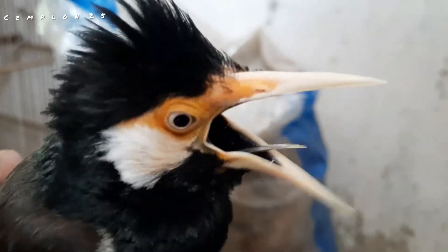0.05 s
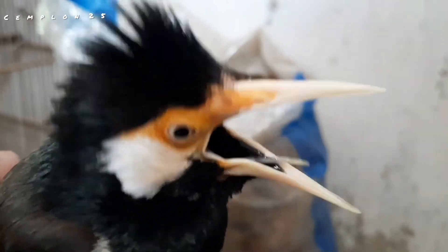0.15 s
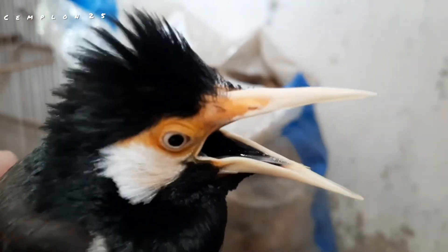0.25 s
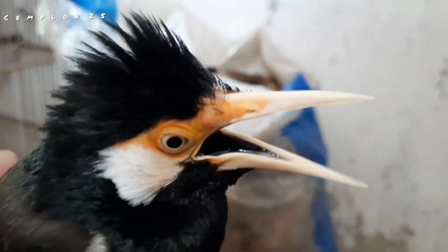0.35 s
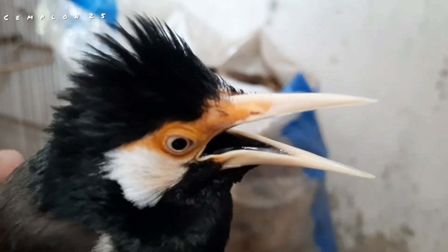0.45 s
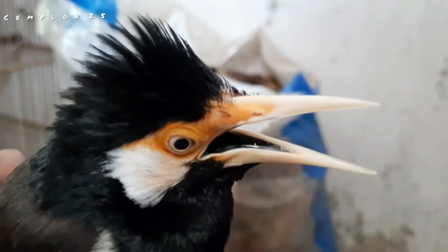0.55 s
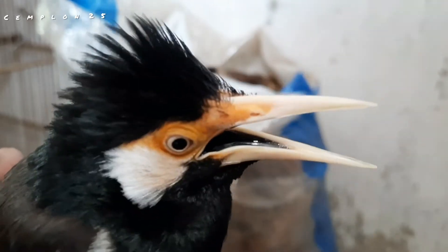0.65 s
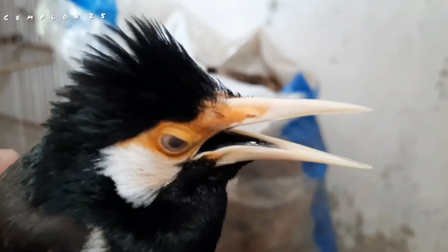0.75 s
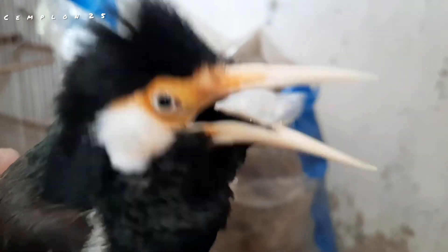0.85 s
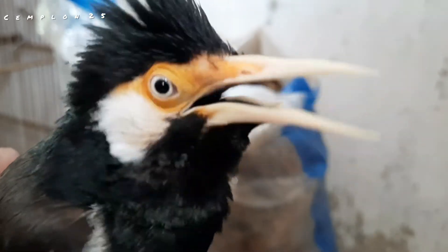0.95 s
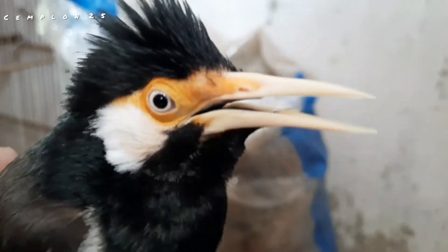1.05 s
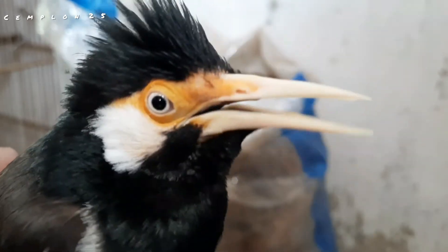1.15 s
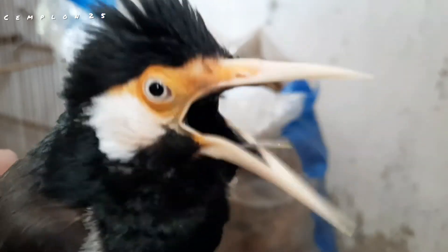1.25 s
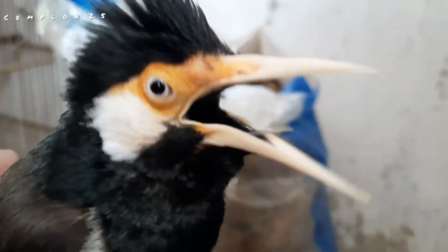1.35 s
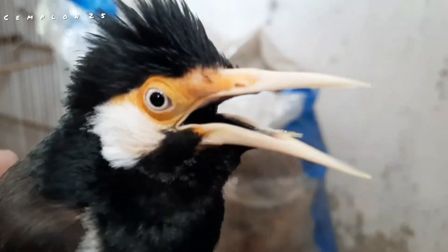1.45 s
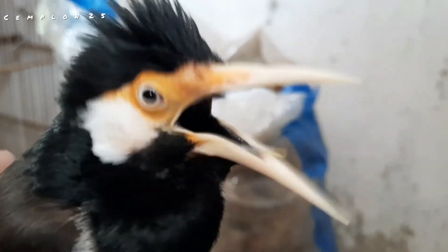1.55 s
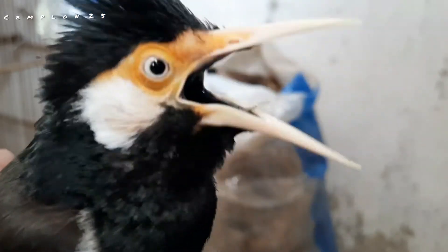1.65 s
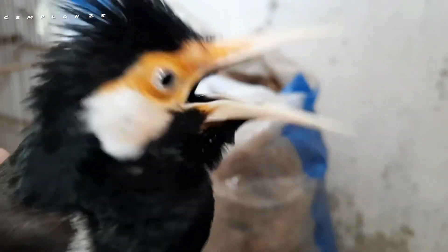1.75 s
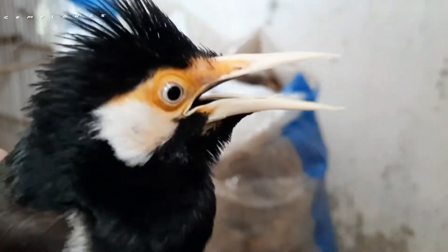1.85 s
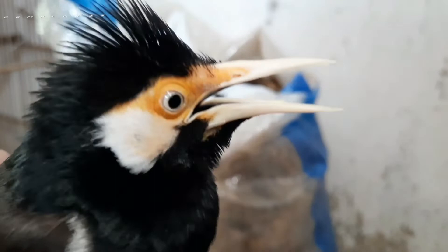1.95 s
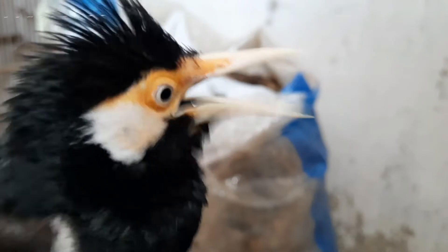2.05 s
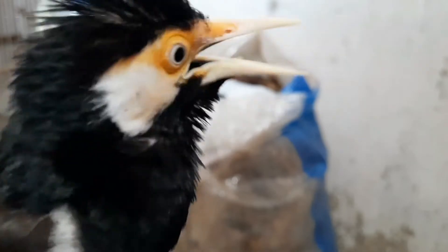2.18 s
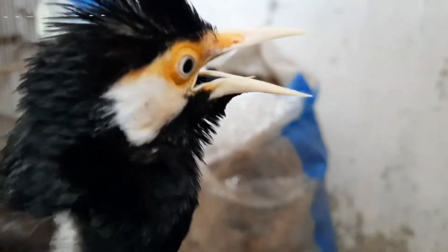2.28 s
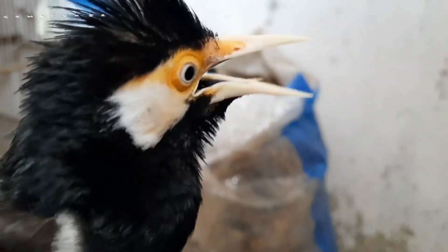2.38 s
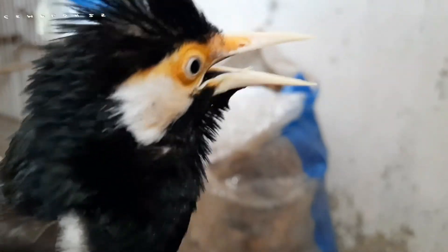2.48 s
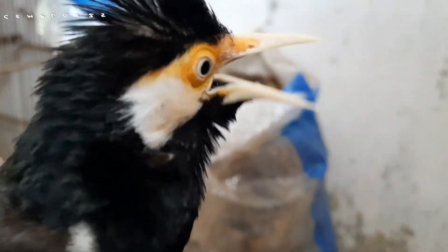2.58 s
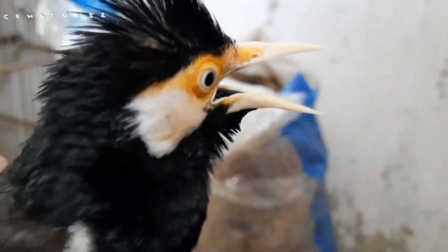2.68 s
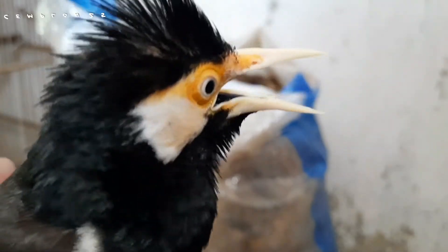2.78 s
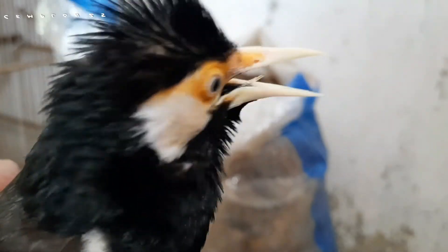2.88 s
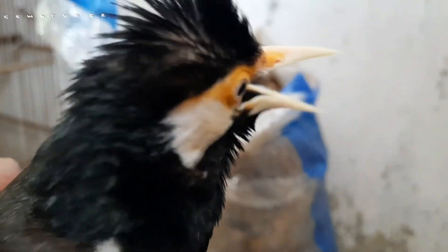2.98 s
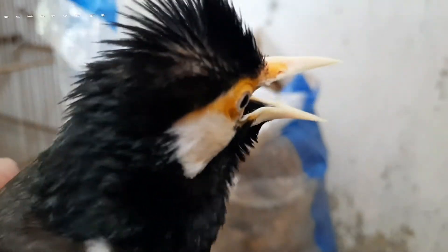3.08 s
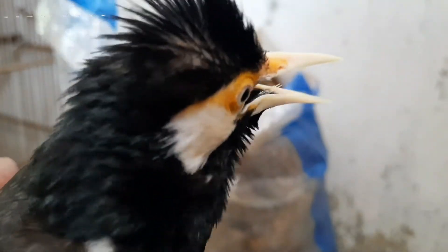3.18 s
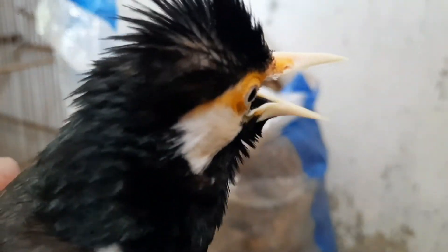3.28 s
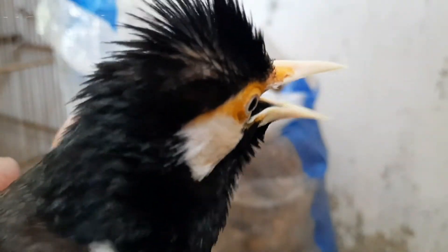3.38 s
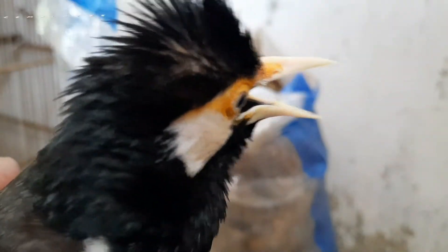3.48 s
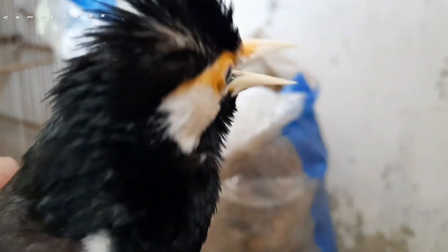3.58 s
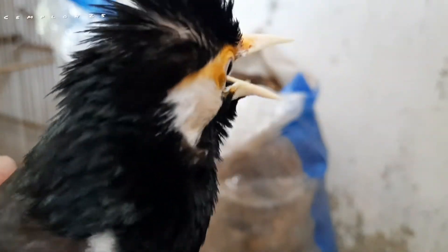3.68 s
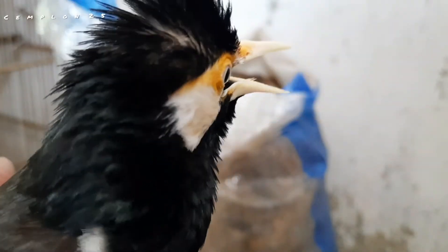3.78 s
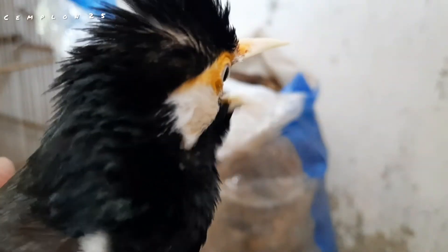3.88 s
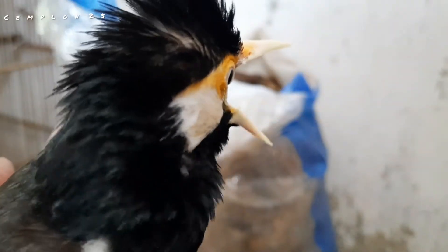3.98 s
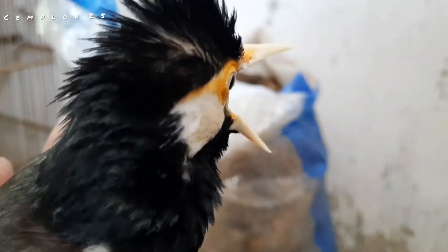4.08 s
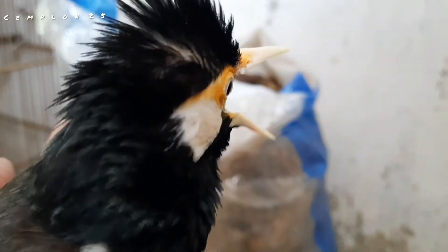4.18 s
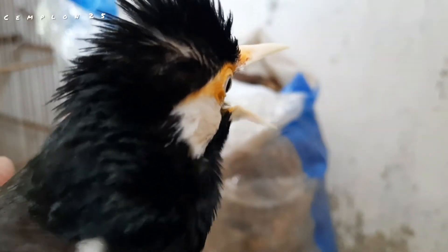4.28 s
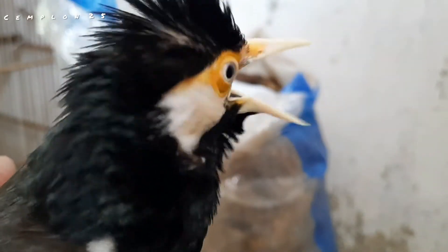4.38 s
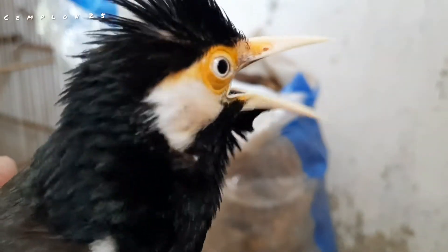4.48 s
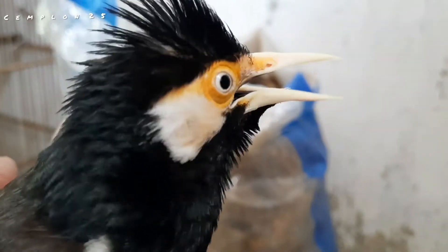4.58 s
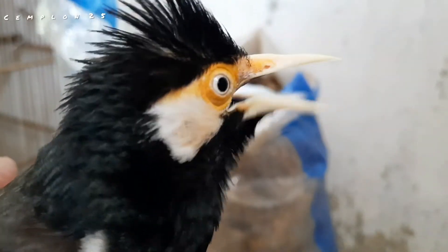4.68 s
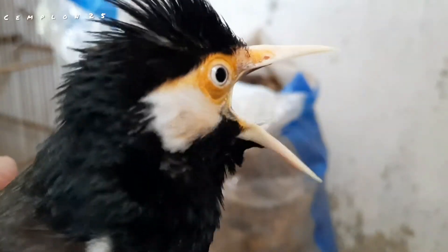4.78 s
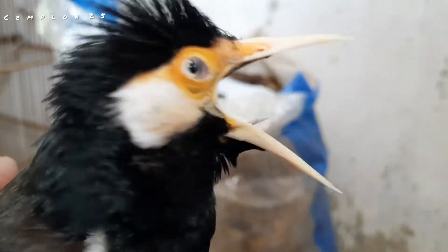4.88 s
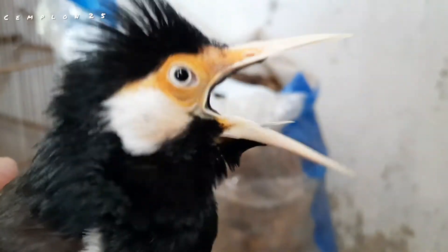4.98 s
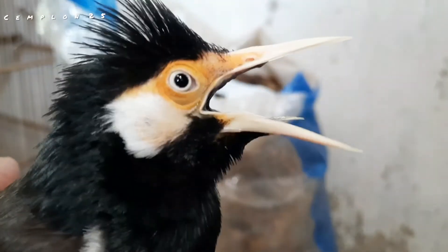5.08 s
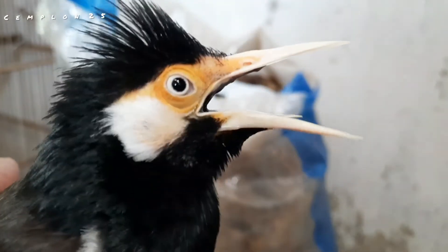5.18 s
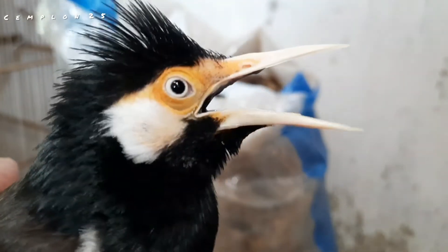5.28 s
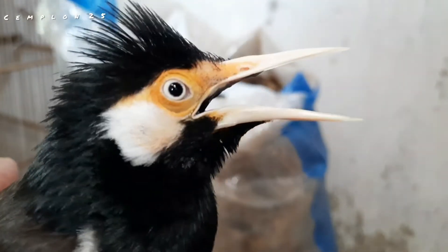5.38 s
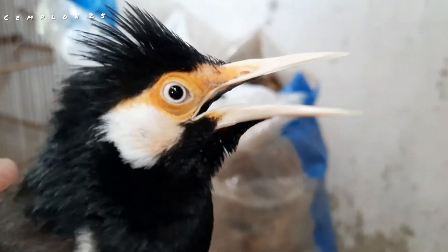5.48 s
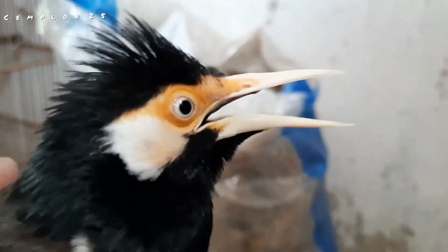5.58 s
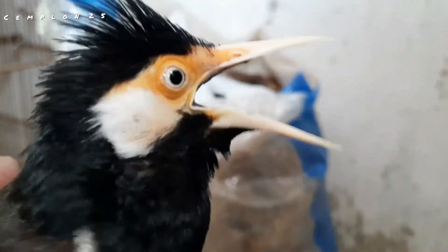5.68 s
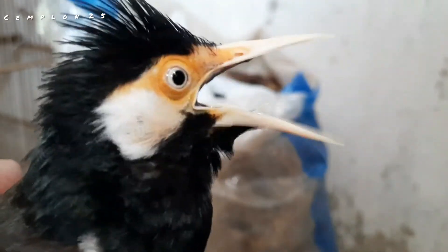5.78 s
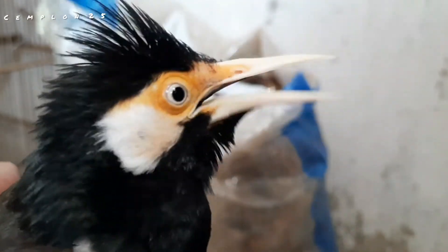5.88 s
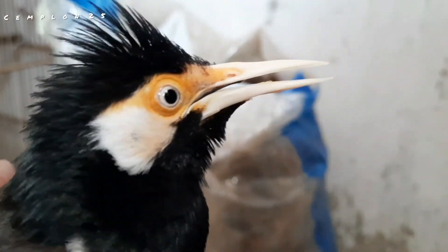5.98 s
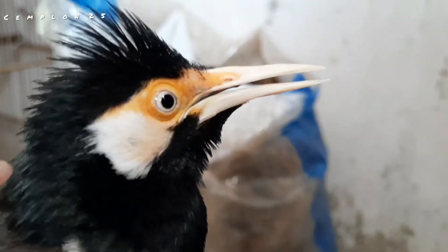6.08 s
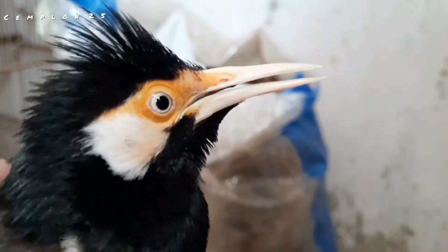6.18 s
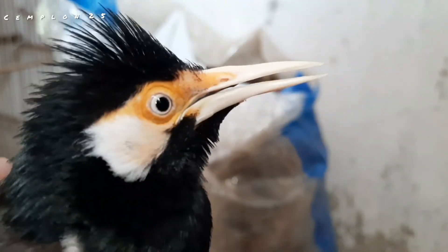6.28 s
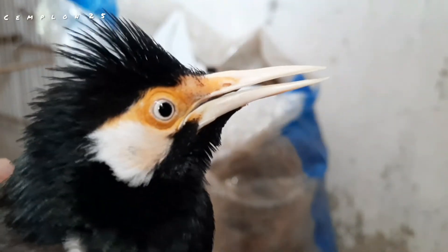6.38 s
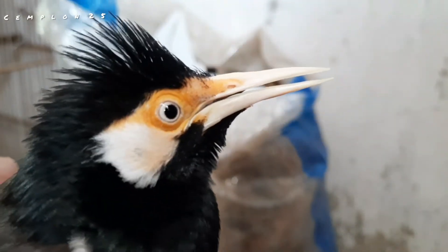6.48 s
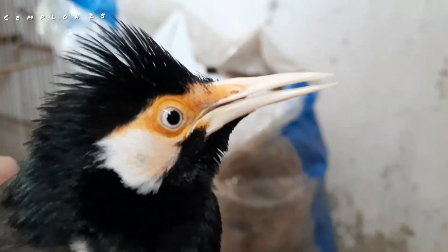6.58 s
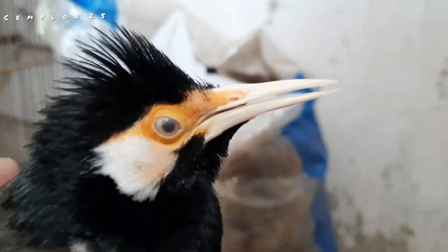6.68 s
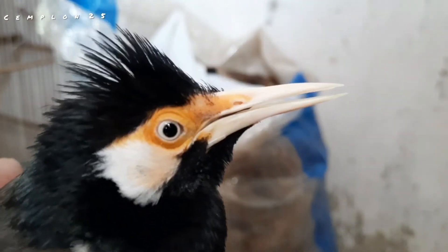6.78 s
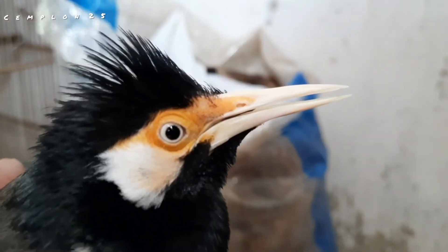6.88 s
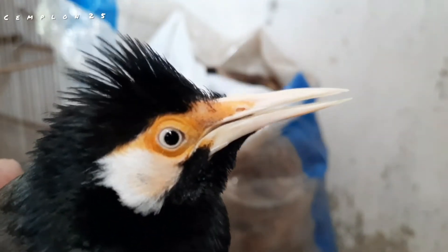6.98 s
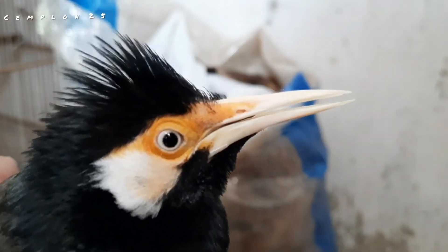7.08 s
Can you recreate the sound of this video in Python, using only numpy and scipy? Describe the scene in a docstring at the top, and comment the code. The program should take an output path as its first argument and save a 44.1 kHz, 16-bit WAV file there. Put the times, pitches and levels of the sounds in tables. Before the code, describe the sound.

A starling sings very close to the microphone in a small, hard-walled room. A loud cut-off whistle opens, then spaced rasping falling slurs, five buzzy churrs ending in rising tones, a nasal note, a falling buzz and a rapid burst of chips. Soft wheezes and squeaks fill the gaps. Two bright chirps follow, then near silence with a few bill clicks over a faint motor hum.

```python
"""In a small hard-walled room, a starling sings very close to a microphone with two ports.
Slurred whistles, trilled churrs, a nasal note, a falling buzz, harsh chatter and chirps are sine waves with
shaken pitch, overtones and hiss. Soft wheezy song between them is noise and a thin tone in a gliding
resonance; squeaks, dry creaks and bill clicks join in. Behind the bird a motor hums and something purrs
far off, made from low sines and banded noise. Room echoes and an overloading microphone shape the sound."""
import sys
import numpy as np
from scipy import signal
from scipy.fft import rfft, irfft, next_fast_len
from scipy.io import wavfile
from scipy.ndimage import uniform_filter1d, map_coordinates

SR = 44100
rng = np.random.default_rng(int(sys.argv[2]) if len(sys.argv) > 2 else 0)


def wav_record(signal):
    """Record a signal, one row per channel, as 16-bit PCM in the file named by sys.argv[1]."""
    frames = np.transpose(np.atleast_2d(signal))
    bounded = np.clip(frames, -1, 1)
    # unit amplitude maps onto the largest positive 16-bit level
    quanta = np.round(bounded * 32767).astype(np.int16)
    wavfile.write(sys.argv[1], SR, quanta)


N = 314874
TOP_HZ = 16200  # no sound passes above this

# Colour of the turbulent air in the throat. Each row: frequency in Hz, relative level in dB per Hz.
HISS = [(300, -22.5), (1100, -20), (3900, -0.5), (5600, -7.5), (7200, -3), (9200, -4), (11200, -13),
        (13000, -8), (16000, -16)]


def amp(db):
    """Turn decibels into a multiplier."""
    return 10 ** (np.asarray(db) / 20)


def unit(x):
    """Scale a sound to an rms of 1."""
    return x / np.sqrt(np.mean(x ** 2) + 1e-20)


def along(points, hz):
    """Read a value between (Hz, value) points, on a log frequency axis."""
    point_hz, value = np.transpose(points)
    return np.interp(np.log(hz + 1), np.log(point_hz + 1), value)


def course(rows, at):
    """Read each column after the first at the given places along the first."""
    place, *columns = np.transpose(rows)
    return [np.interp(at, place, column) for column in columns]


def gesture(rows):
    """The columns of a note, sample by sample from its first row to its last."""
    return course(rows, np.arange(rows[0][0], rows[-1][0], 1 / SR))


def add(track, s, x):
    """Mix x into the track at s seconds."""
    i = int(np.clip(s * SR, 0, N))
    track[i:i + len(x)] += x[:N - i]


def wobble(rate, size):
    """A smooth random curve with this many random points a second."""
    points = rng.standard_normal(int(size * rate / SR) + 4)
    return map_coordinates(points, [np.arange(size) * rate / SR])


def filtered(x, response):
    """Multiply the spectrum of x by a response that depends on frequency."""
    n = x.shape[-1]
    padded = next_fast_len(n + 8192)  # spare room keeps the end from wrapping to the start
    return irfft(rfft(x, padded) * response(np.fft.rfftfreq(padded, 1 / SR)), padded)[..., :n]


def noise(spectrum, size):
    """Coloured noise with an rms of 1."""
    return unit(filtered(rng.standard_normal(size), lambda hz: amp(along(spectrum, hz))))


def phase_of(hz):
    """Add up a changing frequency into the angle of a sine."""
    return 2 * np.pi * np.cumsum(hz) / SR


def eased(x, edge=0.00081):
    """Soft start and stop, edge seconds each."""
    i = np.arange(len(x))
    return x * np.clip(np.minimum(i, i[::-1]) / (edge * SR), 0, 1)


def swell(t, length, attack, release=0.011):
    """Attack, hold and release within the length of a note, all in seconds."""
    return np.clip(np.minimum(t / attack, (length - t) / release), 0, 1)


def syrinx(pitch, rasp, overtone_db, slope_db, hiss_db, jitter=.03, shimmer_db=3):
    """A vibrating membrane: rasp shakes its pitch, level and overtones and lets turbulent air through."""
    # What throat and open bill let through above the fundamental. Each row: frequency in Hz, gain in dB.
    throat = [(4500, 3), (5400, -8.5), (6500, -2), (9700, -2.5), (11200, 7.5), (12600, 3), (14000, -2),
              (15800, 2.5)]
    n = len(pitch)
    shake = wobble(1300, n) + .5 * wobble(220, n)
    phase = phase_of(pitch * (1 + jitter * rasp * shake))
    tone = np.sin(phase)
    for k in range(2, 6):
        flicker_db = 2 * shimmer_db * rasp * wobble(170, n)
        level_db = overtone_db - slope_db * np.log2(k / 2)  # overtones weaken by slope_db per octave
        overtone = amp(level_db + along(throat, k * pitch) + flicker_db)
        tone += overtone * (k * pitch < TOP_HZ) * np.sin(k * phase)
    air = amp(hiss_db) * rasp * noise(HISS, n)
    shimmer = amp(shimmer_db * rasp * wobble(260, n))
    return eased((np.sqrt(2) * tone + air) * shimmer)


def pop(hz):
    """The syrinx opens with a short tick that falls in pitch."""
    pitch = hz * np.linspace(1, .55, SR // 200)
    return syrinx(pitch, 1.0, overtone_db=-20, slope_db=14, hiss_db=-6.5)


def held(rasp=.08, catch_s=.062, catch_rate=76, recover_s=.028, flick_hz=260):
    """A loud whistle lifts; later the voice catches and stutters, and pitch flicks up as the flow drops."""
    # One row: start in seconds, length in seconds, level in dB, first pitch in Hz, last pitch in Hz.
    held_note = (0, 0.09, -6, 4060, 4280)
    s, length, db, first_hz, last_hz = held_note
    t = np.arange(int(length * SR)) / SR
    since = t - catch_s
    pulses = np.cos(np.pi * catch_rate * since) ** 8
    catches = pulses * (since > -.5 / catch_rate) * np.exp(-np.abs(since) / recover_s)
    flow = swell(t, length, .005) * (1 - catches)
    lift = (last_hz - first_hz) * np.sqrt(t / length)
    flick = flick_hz * (1 - flow) * (t > catch_s / 2)
    tone = syrinx(first_hz + lift + flick, rasp + catches, overtone_db=-18.5, slope_db=1.0, hiss_db=-24)
    out = np.zeros(N)
    add(out, s, amp(db + wobble(140, len(t))) * flow * tone)
    return out


def slurs(crest_rasp=.14, low_rasp=.62, tick_s=0.0042, waver=.021, fall_s=.023, sink_db=2.5, brighten=.81):
    """After a tick, pitch climbs to a crest and drops, rasping and wavering; louder slurs are brighter."""
    # Each row: start in seconds, length in seconds, level in dB, attack in seconds, time to the crest in
    # seconds, then the first, crest, settled and last pitch in Hz.
    slur_rows = [(0.801, 0.15, -16.5, 0.038, .014, 3550, 3580, 3080, 2409),
                 (1.207, .13, -12, .009, .026, 3950, 4404, 2958, 2889),
                 (1.545, .162, -10, .014, .02, 2386, 4450, 2785, 3014)]
    out = np.zeros(N)
    for s, length, db, attack, crest_s, first_hz, crest_hz, settled_hz, last_hz in slur_rows:
        t = np.arange(int(length * SR)) / SR
        sunk = 1 - 1 / (1 + (np.maximum(t - crest_s, 0) / fall_s) ** 2.7)  # from 0 at the crest towards 1
        high = crest_hz + (first_hz - crest_hz) * np.maximum(1 - t / crest_s, 0) ** 2
        low = np.interp(t, [crest_s + 2 * fall_s, length], [settled_hz, last_hz])
        low = low * (1 + waver * wobble(80, len(t)))
        pitch = high + (low - high) * sunk
        rasp = crest_rasp + (low_rasp - crest_rasp) * sunk
        overtone_db = -7 + brighten * db + 3 * sunk  # brighten: dB of overtones per dB of level
        tone = syrinx(pitch, rasp, overtone_db=overtone_db, slope_db=7.0, hiss_db=-24)
        add(out, s, amp(db - sink_db * sunk) * swell(t, length, attack) * tone)
        add(out, s, amp(db) * (tick_s / attack) ** 2 * pop(crest_hz))  # faster attack, harder tick
    return out


def churrs(trill_jitter=.05, depth_hz=380, lead=0.013, throb_db=4.0, fizz_db=-23):
    """The syrinx pops open, trills, then settles on a smoother rising tone; air fizzes with the trill."""
    # Each row: start in seconds, length in seconds, level in dB, trill swings a second, trilled share of
    # the length.
    churr_rows = [(2.07, 0.17, -17, 86, .76), (2.448, .163, -13.5, 74, .53), (2.854, 0.16, -12, 72, .66),
                  (3.154, .156, -10.5, 72, .51), (3.531, .15, -13, 70.5, .66)]
    # The course of every churr. Each row: share of its length, pitch in Hz, added level in dB.
    churr_shape = [(0, 2139, -7.5), (.13, 2221, -3.5), (.42, 2188, -3), (.7, 2319, 1.5), (.92, 2442, -2),
                   (1, 2472, -7)]
    fizz_colour = [(2800, -24), (4200, 0), (11000, -12.5), (13500, 2), (16000, -10)]  # (Hz, dB per Hz)
    out = np.zeros(N)
    for s, length, db, rate, share in churr_rows:
        t = np.arange(int(length * SR)) / SR
        pitch, shape_db = course(churr_shape, t / length)
        trill = np.clip((share - t / length) / 0.27 + 0.67, .12, 1)
        turn = phase_of(rate * (1 + trill_jitter * wobble(60, len(t)))) + .9
        swing = np.cos(turn)
        rasp = 0.29 + 0.28 * trill
        tone = syrinx(pitch + depth_hz * trill * swing, rasp, overtone_db=-25, slope_db=10, hiss_db=-15.5)
        fizz = amp(fizz_db) * trill * noise(fizz_colour, len(t)) * (1 + .5 * swing)
        throb = -throb_db * trill * (np.sin(turn) + .5)  # loudest on each rising stroke
        add(out, s, amp(db + shape_db + throb) * (tone + fizz))
        add(out, s - lead, amp(db - 12.5) * pop(hz=2594))
    return out


def nasal(hiss_db=-15):
    """A low, nearly steady note, rich in harmonics, with air rasping through it."""
    # Each row: time in seconds, pitch in Hz, level in dB.
    nasal_rows = [(3.863, 1260, -28), (3.878, 1417, -24), (3.92, 1494, -24), (4.085, 1541, -22),
                  (4.115, 1474, -33)]
    # Level in dB of each harmonic, from the fundamental up.
    harmonics_db = [-2.5, 4, -14, -9.5, -14, -21, -14]
    pitch, db = gesture(nasal_rows)
    n = len(db)
    phase = phase_of(pitch * (1 + 0.00194 * wobble(400.6, n)))
    tone = np.zeros(n)
    for k, level in enumerate(harmonics_db, 1):
        tone += amp(level + 1.2 * wobble(22.7, n)) * np.sin(k * phase)
    air = amp(hiss_db) * noise(HISS, n)
    out = np.zeros(N)
    add(out, nasal_rows[0][0], eased(amp(db) * (tone + air)))
    return out


def buzz(rate=88, depth_hz=310, throb_db=5):
    """A fast trill on a falling pitch, loudest at the top of each swing."""
    # Each row: time in seconds, pitch in Hz, level in dB, trill depth from 0 to 1.
    buzz_rows = [(4.293, 2915, -21.5, 0.1), (4.318, 2708, -13, .4), (4.345, 2428, -15.5, 1),
                 (4.495, 2084, -18.5, 1), (4.513, 2040, -30.5, .8)]
    pitch, db, depth = gesture(buzz_rows)
    swing = depth * np.cos(2 * np.pi * rate * np.arange(len(db)) / SR - 2.0)
    tone = syrinx(pitch + depth_hz * swing, 0.58 * depth, overtone_db=-19.0, slope_db=11.0, hiss_db=-15.0)
    out = np.zeros(N)
    add(out, buzz_rows[0][0], amp(db + throb_db * swing) * tone)
    return out


def chatter():
    """Hard chips: a faint rising lead-in snaps into a loud tone that grows rougher and noisier."""
    # Each row: start in seconds, length in seconds, level in dB, reference pitch near the top in Hz.
    chatter_rows = [(4.711, .026, -21, 3900), (4.75, .023, -13, 3850), (4.796, .023, -13, 3950),
                    (4.839, .023, -10.5, 3950), (4.885, .023, -11, 3950), (4.929, .009, -15.5, 4150)]
    # The course of every chip. Each row: share of its length, share of the reference pitch, added level in dB.
    chip_shape = [(0, 0.59, -13), (.26, .9, -8), (.38, .96, 2), (1, 1.02, -6.5)]
    out = np.zeros(N)
    for s, length, db, top_hz in chatter_rows:
        u = np.linspace(0, 1, int(length * SR))
        pitch, shape_db = course(chip_shape, u)
        chip = syrinx(top_hz * pitch, .5 + .5 * u, overtone_db=-12, slope_db=8.5, hiss_db=-12, jitter=.08)
        add(out, s, amp(db + shape_db) * chip)
    return out


def chirps(rasp=0.49):
    """Bright, rasping chirps from the syrinx: an arch of pitch, then a quick warble."""
    # One list for each chirp. Each row: time in seconds, pitch in Hz, level in dB.
    chirp_lists = [
        [(5.617, 1900, -35.5), (5.63, 2900, -22.5), (5.66, 3150, -24), (5.68, 3729, -10.5),
         (5.712, 3560, -24.5)],
        [(5.73, 2550, -24), (5.742, 3270, -13), (5.747, 2900, -17), (5.755, 3290, -14), (5.764, 2700, -20),
         (5.771, 3350, -13.5), (5.789, 3180, -14), (5.802, 2450, -22)],
    ]
    out = np.zeros(N)
    for note in chirp_lists:
        pitch, db = gesture(note)
        tone = syrinx(pitch, rasp, overtone_db=-14.5, slope_db=7.5, hiss_db=-17.5)
        add(out, note[0][0], amp(db) * tone)
    return out


def squeaks():
    """Soft hoarse slurs: a rough membrane tone glides in pitch as it swells and fades."""
    # Each row: start in seconds, length in seconds, level in dB, first pitch in Hz, last pitch in Hz.
    squeak_rows = [(1.423, .06, -38.5, 4020, 5374), (1.431, .055, -41.5, 2000, 2760),
                   (1.764, .09, -38, 2685, 2130), (2.714, 0.1, -33, 3523, 4154),
                   (3.481, 0.11, -25, 3900, 4000), (3.913, .04, -22, 4500, 3750)]
    out = np.zeros(N)
    for s, length, db, first_hz, last_hz in squeak_rows:
        pitch = np.linspace(first_hz, last_hz, int(length * SR))
        tone = syrinx(pitch, .7, overtone_db=-17.5, slope_db=11, hiss_db=-11.5)
        add(out, s, amp(db) * np.hanning(len(pitch)) ** .5 * tone)
    return out


def wheeze(width=0.17, hiss_db=-18.0, flutter_db=2.5, thread=0.73, wander=0.086, rise=600, release=330):
    """Soft song: rasping air in one gliding throat resonance, with a thin tone wandering through it."""
    # Each row: start in seconds, length in seconds, level in dB, first resonance in Hz, last resonance in Hz.
    wheeze_rows = [(0.979, .16, -43, 2996, 3673), (1.485, .06, -31.5, 3682, 3285),
                   (1.718, .06, -39, 3897, 3498), (2.08, .19, -36, 4500, 4300),
                   (2.269, .15, -30, 3591, 3430), (3.029, .07, -30.5, 3200, 3404),
                   (3.29, .07, -30, 3696, 3200), (3.477, .05, -26.5, 2998, 3700),
                   (3.689, .05, -26.5, 2997, 3090), (3.76, .11, -38, 4680, 4600),
                   (4.079, .145, -24.5, 3196, 2924), (4.52, .08, -29, 2951, 3084),
                   (4.624, .045, -23.5, 2945, 2994)]
    hz, t, z = signal.stft(rng.standard_normal(N), SR, nperseg=256)
    s, length, db, first_hz, last_hz = np.transpose(wheeze_rows)[..., None]
    # rise and release are in dB a second, before the start and after the end
    flow = amp(db - rise * np.maximum(s - t, 0) - release * np.maximum(t - s - length, 0))
    glide = first_hz + (last_hz - first_hz) * np.clip((t - s) / length, 0, 1)
    centre = np.average(glide, axis=0, weights=flow + 1e-12)  # the strongest wheeze steers the throat
    resonance = 1 / (1 + (np.log((hz[:, None] + 1) / centre) / width) ** 4)
    # random patches in time and frequency make the rasp uneven
    smear = np.outer(np.hanning(7), np.hanning(48))
    patches = unit(signal.fftconvolve(rng.standard_normal(z.shape), smear, "same"))
    gain = (resonance + amp(hiss_db + along(HISS, hz))[:, None]) * amp(5 * patches)
    rasp = unit(signal.istft(z * gain / np.linalg.norm(gain, axis=0), nperseg=256)[1])
    times = np.arange(N) / SR
    level = np.interp(times, t, np.linalg.norm(flow, axis=0))
    pitch = np.interp(times, t, centre) * (1 + wander * wobble(55, N))
    tone = np.sin(phase_of(pitch))
    return level * amp(flutter_db * wobble(90, N)) * unit(rasp[:N] + thread * tone)


def creaks(fade_db=11):
    """Trains of dry puffs in a high throat resonance, each starting sharply and fading."""
    # Each row: start in seconds, length in seconds, first level in dB, last level in dB, puffs a second.
    creak_rows = [(.583, .22, -57, -40, 35), (1.913, .14, -37.5, -34, 19)]
    # Colour of the puffs. Each row: frequency in Hz, relative level in dB per Hz.
    creak_colour = [(900, -23), (4700, 1), (6500, -17.5), (16000, -21.5)]
    out = np.zeros(N)
    for s, length, first_db, last_db, rate in creak_rows:
        n = int(length * SR)
        within_puff = rate * np.arange(n) / SR % 1
        puffs_db = np.linspace(first_db, last_db, n) - fade_db * within_puff
        add(out, s, eased(amp(puffs_db) * noise(creak_colour, n)))
    return out


def bill(t60=.012, ring_db=-15, ring_hz=2450, ring_t60=0.061):
    """The bill snaps shut and rings very briefly: a fading noise burst and a fading sine."""
    # Each row: time in seconds, level in dB.
    bill_rows = [(6.026, -25), (6.303, -35), (7.07, -26.5)]
    out, t = np.zeros(N), np.arange(SR // 10) / SR
    for s, db in bill_rows:
        snap = amp(-60 * t / t60) * noise(HISS, len(t))
        ring = amp(ring_db - 60 * t / ring_t60) * np.sin(2 * np.pi * ring_hz * t)
        add(out, s, amp(db) * (snap + ring))
    return out


def purring(rate=33, pulse_db=5):
    """A far, pulsing call: noise in one narrow resonance, growing louder through each call."""
    # Each row: start in seconds, end in seconds, level in dB before the pulses and the growth.
    purr_rows = [(0.843, 1.618, -54.5), (3.05, 3.526, -54.5), (5.253, 5.781, -54.5), (6.995, 7.16, -48)]
    out = np.zeros(N)
    for start, end, db in purr_rows:
        n = int((end - start) * SR)
        pulse = np.sin(phase_of(rate * (1 + 0.12 * wobble(10, n))))
        pulses = amp(pulse_db * pulse + np.linspace(-8, -1, n))
        band = noise([(850, -32), (1240, -2), (1500, -16), (6000, -42)], n)
        add(out, start, amp(db) * eased(pulses * band, edge=0.099))
    return out


def background(floor_db=-73):
    """A distant motor: wavering sines and a low rumble, over the faint hiss of still air."""
    # Course of the motor. Each row: time in seconds, level in dB.
    hum_course = [(0, -62), (1.4, -50), (3.0, -66.5), (4.0, -76), (7.14, -66.5)]
    # Tones of the motor. Each row: middle frequency in Hz, relative level in dB.
    hum_lines = [(86, 2.5), (220, -9), (345, -12)]
    # Colour of still air. Each row: frequency in Hz, relative level in dB per Hz.
    air_colour = [(50, -4), (16000, -39)]
    db, = course(hum_course, np.arange(N) / SR)
    speed = 1 + 0.013 * wobble(3.7, N)
    lines = np.zeros(N)
    for hz, level in hum_lines:
        lines += amp(level + 1.2 * wobble(15, N)) * np.sin(phase_of(hz * speed))
    rumble_colour = [(25, -22), (70, -3), (370, -16.5), (900, -37)]  # (Hz, dB per Hz)
    rumble = np.array([noise(rumble_colour, N) for port in range(2)])
    shared_rumble = .5 * (rumble + rumble.mean(axis=0))  # partly alike at both ports
    air = np.array([noise(air_colour, N), noise(air_colour, N)])
    return amp(db) * (lines + shared_rumble) + amp(floor_db) * air


def ports(x):
    """The bird is nearer the left port: it arrives there earlier and louder, by amounts that vary with pitch."""
    # Each row: frequency in Hz, left minus right level in dB, head start of the left in seconds.
    port_rows = [(1480, 5, 0.00021), (2170, 3, 0.000088), (3220, 6.5, 0.0002), (4240, 2, 0.00018),
                 (8367, 1.5, 0.00017), (11200, 4, 0.00015)]

    def response(hz):
        """Gain and time shift of the left and right port."""
        db, lead = course(port_rows, hz)
        gains = np.array([amp(db), np.ones_like(hz)]) / np.sqrt((1 + amp(db) ** 2) / 2)
        return gains * np.exp(1j * np.pi * hz * lead * np.array([[1], [-1]]))
    return filtered(x, response)


def room(x, early_db=16, early_t60=0.062):
    """Things close by answer strongly and briefly, the walls with a weaker tail, different at each port."""
    # Each row: frequency in Hz, time in seconds for the wall echoes to fall by 60 dB.
    echo_times = [(3000, 0.37), (12000, 0.17)]
    hz, t, z = signal.stft(rng.standard_normal((2, SR // 2)), SR, nperseg=256)
    walls = amp(-60 * t / along(echo_times, hz)[:, None])
    nearby = amp(early_db - 60 * t / early_t60)
    tail = signal.istft(z * (walls + nearby), SR, nperseg=256)[1]
    delayed = np.pad(x, (SR // 300, 0))[None]  # the echoes start 1/300 s late
    return signal.fftconvolve(delayed, tail / np.linalg.norm(tail[0]), axes=1)[:, :N]


def scene():
    """The wheeze gives way while the air drives a loud note; bird, echoes and background are mixed."""
    notes = held() + slurs() + churrs() + nasal() + buzz() + chatter() + chirps()
    effort = uniform_filter1d(np.abs(notes), SR // 100)
    bird = notes + squeaks() + wheeze() / (1 + effort / .5) + creaks() + bill()
    distant = (background() + purring()) * amp([[1.5], [-1.5]])  # stronger at the left port
    return ports(bird) + amp(-5.5) * room(bird) + distant


def record(dry, thud_db=-4.5, shrill_hz=3800):
    """Loud, shrill notes overload the microphone and thud in the bass; the highest peaks are softly rounded
    off."""
    shrill = filtered(dry, lambda hz: 1 - 1 / (1 + (hz / shrill_hz) ** 4))
    # squaring gives a low push that follows the loudness of the shrill part
    thud = filtered(shrill ** 2, lambda hz: hz / (hz + 100) / (1 + (hz / 280) ** 2))
    driven = dry + amp(thud_db) * thud
    rounded = driven / (1 + np.abs(driven / .97) ** 10) ** (1 / 10)
    return filtered(rounded, lambda hz: hz < TOP_HZ)


dry = scene()
out = record(dry)
wav_record(out)
```